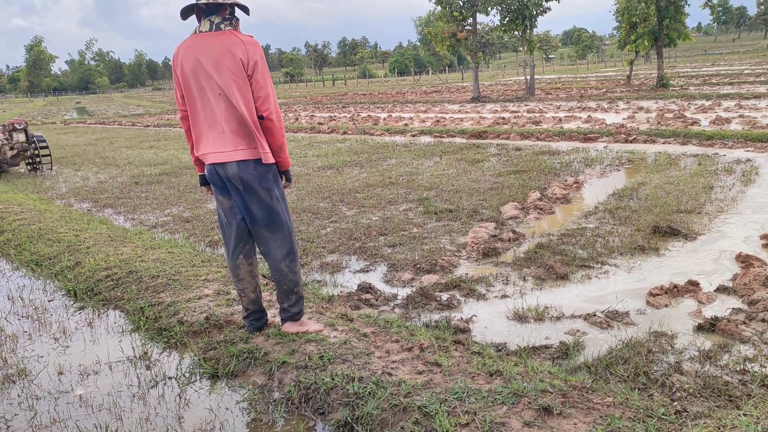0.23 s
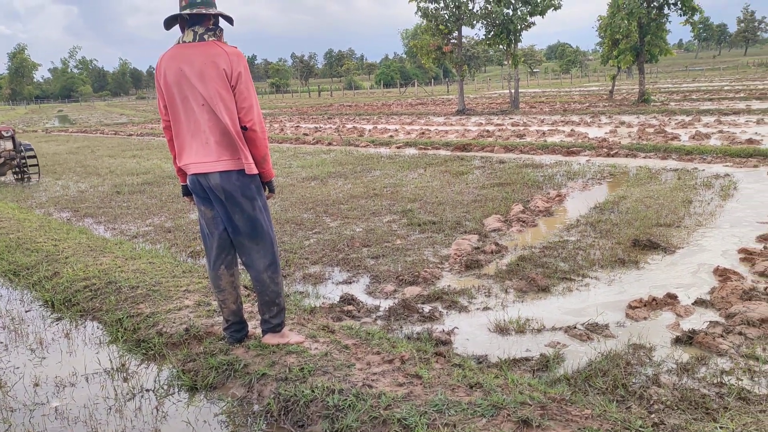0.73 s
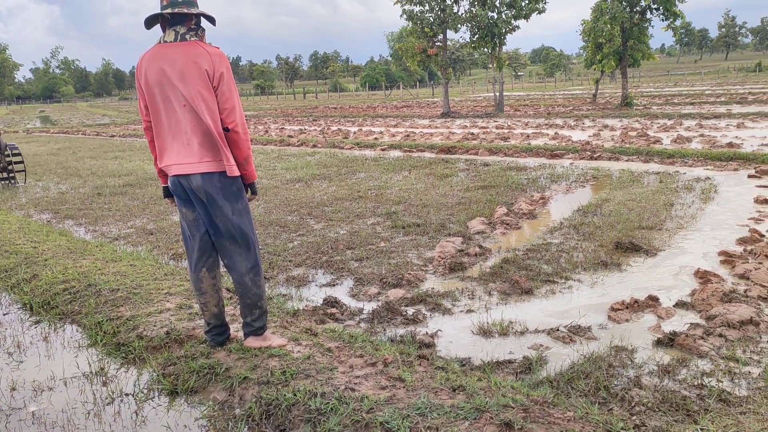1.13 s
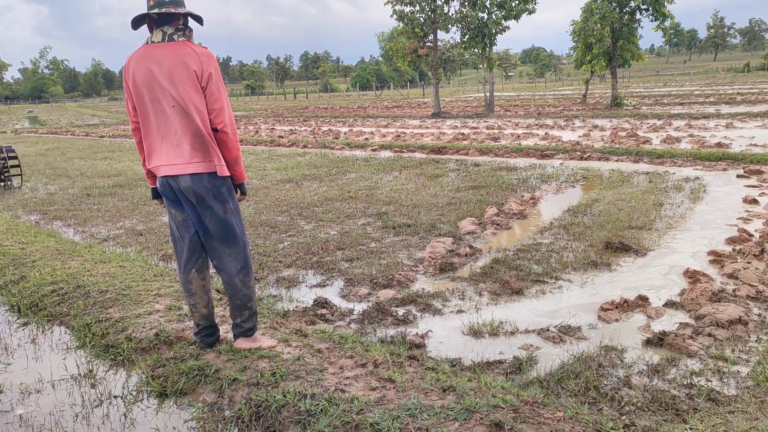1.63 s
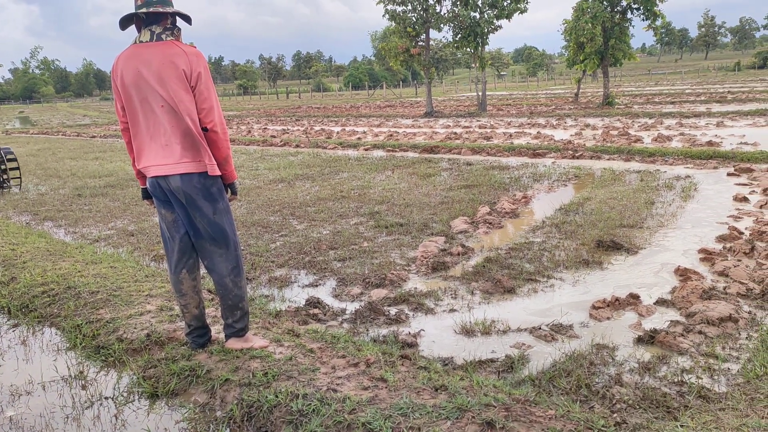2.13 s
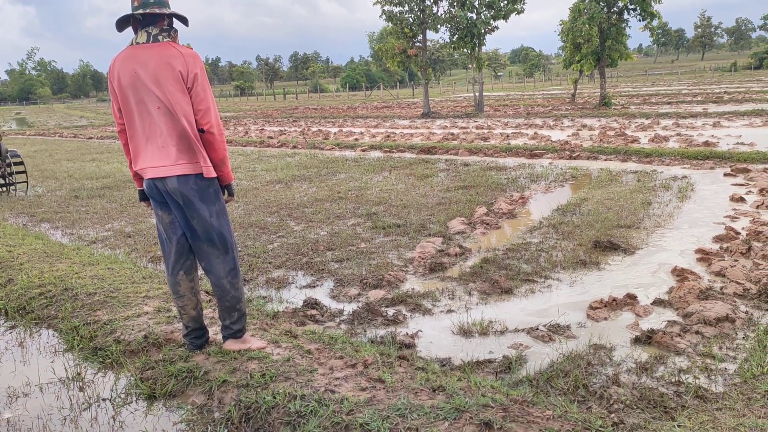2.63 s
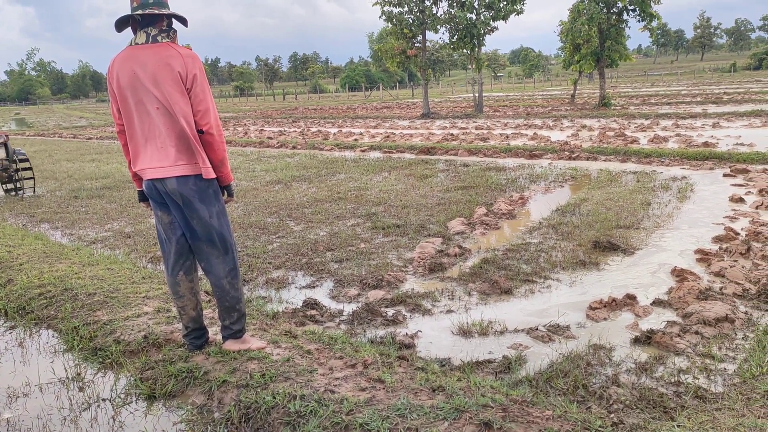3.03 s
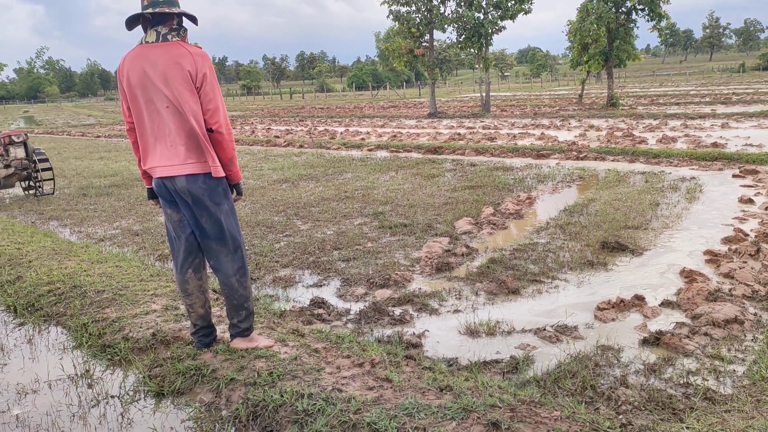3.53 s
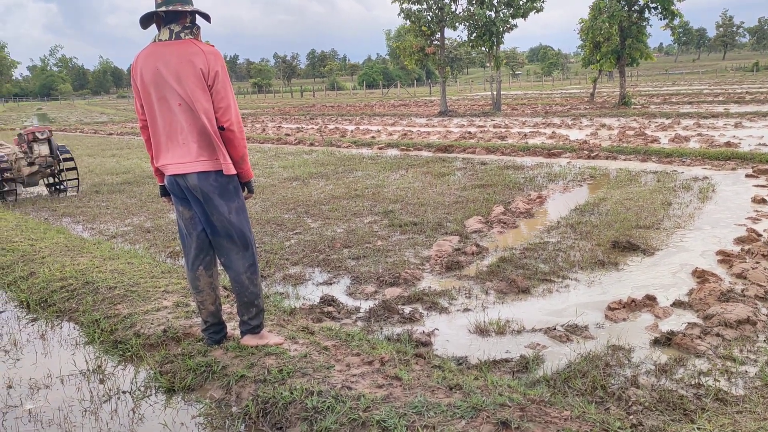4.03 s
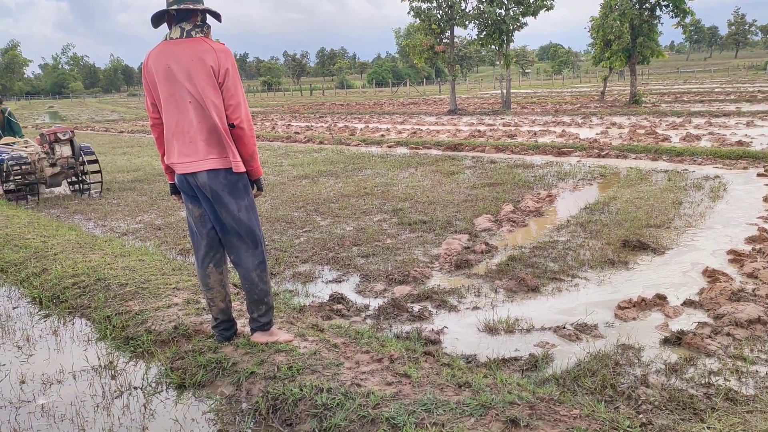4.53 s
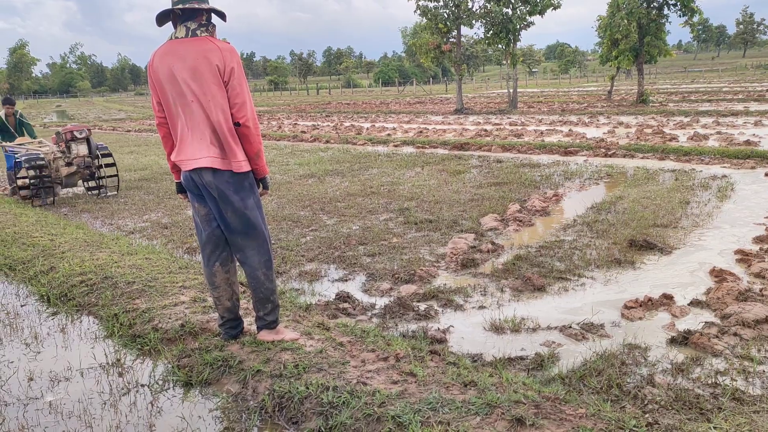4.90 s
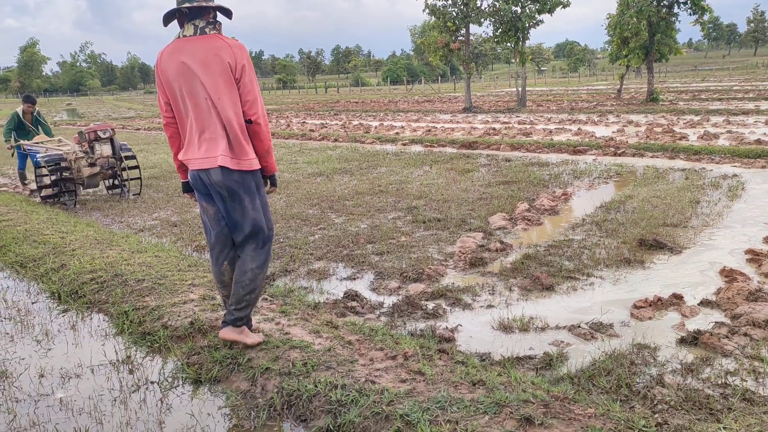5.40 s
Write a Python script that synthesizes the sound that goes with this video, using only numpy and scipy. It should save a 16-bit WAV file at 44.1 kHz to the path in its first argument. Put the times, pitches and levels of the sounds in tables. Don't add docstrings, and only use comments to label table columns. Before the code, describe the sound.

A single-cylinder diesel walking tractor knocks rapidly off to the left in an open field while wind gusts thud and crackle over the microphone.

```python
import sys
import numpy as np
from scipy import signal
from scipy.fft import rfft, irfft, next_fast_len
from scipy.io import wavfile
from scipy.ndimage import uniform_filter1d

SR = 44100
rng = np.random.default_rng(int(sys.argv[2]) if len(sys.argv) > 2 else 0)


def makeup_ratio(level_db):
    decades = np.asarray(level_db, float) / 20
    return 10 ** decades


def to_wav(sig):
    pcm = np.clip(np.atleast_2d(sig), -1, 1) * 32767
    pcm = np.round(pcm).astype(np.int16)
    wavfile.write(sys.argv[1], SR, pcm.T)


N = 249606
T = np.arange(N) / SR
COARSE = T[::64]
LAG_S = 14 / SR


# [t/s, level/dB, turn toward the bright side/dB]
RUNNING = [(0, 0, 1.5), (0.3, 1, 1), (0.52, 0, 2), (0.9, 3, -3.5), (1.4, 2.5, -1), (1.63, -2.5, -2),
           (1.95, 2.5, -3), (2.17, -2, 0.5), (2.27, -5, -3), (2.6, -1, -1.5), (3.0, 2.5, -1),
           (3.22, -3.5, -0.5), (3.7, 2.5, 0.5), (3.95, -2, 3), (4.2, 2, 2.5), (4.54, 1.5, 0),
           (4.62, -8.5, 1.5), (5.66, -9, 2)]


def running():
    return curves(RUNNING)


# [t/s, firings so far]
CRANK = [(-0.007, 0), (0.703, 7), (1.528, 15), (2.048, 20), (2.761, 27), (3.267, 32), (4.067, 40),
         (4.86, 48), (5.447, 54), (5.75, 57)]


def crank():
    s, turned = np.transpose(CRANK)
    firings = np.interp(np.arange(turned[-1] + 1), turned, s)
    cycle = np.searchsorted(firings, T, "right") - 1
    return cycle, T - firings[cycle], np.diff(firings)


def knock():
    cycle, since, length = crank()
    level_db, turn_db = running()
    luck_db = 1.73 * rng.standard_normal((len(length), 2))[cycle]
    low_db = -24 + level_db - 0.19 * turn_db + luck_db[:, 0]
    high_db = -25.5 + 0.88 * level_db + 1.44 * turn_db + luck_db[:, 1]
    fresh = port_noise()
    habit = fresh[:, :SR][:, np.round(since * SR).astype(int)]
    white = 0.5 * habit + 0.87 * fresh
    deep = burst(since - 0.0012, 0.00091, 0.0051) + makeup_ratio(-11.5) * burst(since, 0.001, 0.047)
    low = burst(since, 0.0007, 0.0045) + makeup_ratio(-16) * burst(since, 0.0021, 0.038)
    high = burst(since, 0.00098, 0.0065) + makeup_ratio(-10) * burst(since, 0.0044, 0.027)
    blows = ping(low_db - 2.2 * turn_db, since)
    blows += block(makeup_ratio(low_db - 1) * white * deep, 490, 1600, 0.64, port=0)
    blows += block(makeup_ratio(low_db + 4.5) * white * low, 1540, 3532, 0.34, port=0)
    blows += block(makeup_ratio(high_db - 1) * white * high, 3390, 8670, 1, port=1)
    blows += block(makeup_ratio(low_db - 26.5) * white * high, 4800, 15600, 0.1, port=0)
    return blows


def ping(cycle_db, since):
    tone = np.sin(2 * np.pi * 2697 * since)
    note = makeup_ratio(cycle_db + 2.5) * burst(since, 0.00097, 0.0033) * tone
    return np.array([note, makeup_ratio(-9) * np.interp(T - LAG_S, T, note)])


# [f/Hz, width/Hz, level over the valleys/dB]
BLOCK = [(1150, 80, 4), (1425, 22, 17), (1780, 90, 7), (2010, 70, 8), (2350, 110, 9), (2680, 170, 13),
         (3300, 150, 4), (3750, 110, 8), (4550, 250, 5), (4800, 120, 5), (5850, 200, 6), (6780, 200, 7)]


def block(drive, lo_hz, hi_hz, ring, port):
    hz = np.fft.rfftfreq(8192, 1 / SR) + 1
    peaks = sum(makeup_ratio(2 * ring * db) / (1 + (2 * (hz - f) / w) ** 2) for f, w, db in BLOCK)
    edges = 1 / (1 + (lo_hz / hz) ** 24) / (1 + (hz / hi_hz) ** 24)
    body_db = 10 * np.log10((1 + peaks) * edges + 1e-12)
    heard_db = body_db + read((LEFT_PORT, RIGHT_PORT)[port], hz)
    gain = np.sqrt(np.mean(makeup_ratio(2 * heard_db)))
    response = causal(body_db + read(LEFT_PORT, hz))
    return signal.oaconvolve(drive, response[None] / gain, axes=1)[:, :N]


# [f/Hz, level/dB]
LEFT_PORT = [(600, -17.5), (950, -22), (1250, 7.5), (2600, 7.5), (3100, -0.5), (4200, 3.5), (5300, -4.5),
             (6500, -7.5), (7400, -12.5), (8100, -23), (9000, -13), (10400, -10), (13500, -6.5), (15300, 0)]
RIGHT_PORT = [(600, -50), (950, -4), (1250, -1.5), (2200, -0.5), (3100, 0.5), (4500, 7.5), (5500, 2),
              (6500, -10), (7300, -33), (8100, -63), (9400, -25), (11500, -12), (13000, -120),
              (15300, -117)]
# [f/Hz, likeness 0-1]
LIKENESS = [(1000, .95), (1500, 0.88), (3400, 0.9), (4300, 0.75), (6000, 0.4), (7500, 0.5), (15000, 0.4)]


def port_noise():
    size = next_fast_len(N)
    hz = np.fft.rfftfreq(size, 1 / SR)
    left, other = rfft(rng.standard_normal((2, size)))
    same = np.clip(read(LIKENESS, hz), 0, 1)
    late = left * np.exp(-2j * np.pi * hz * LAG_S)
    right = same * late + np.sqrt(1 - same ** 2) * other
    shade = makeup_ratio(read(RIGHT_PORT, hz) - read(LEFT_PORT, hz))
    return irfft([left, right * shade], size)[:, :N]


# [share of the cycle, level over the clatter/dB, decay/s]
VALVES = [
    (.27, 5, 0.0082),
    (.44, -11.5, 0.002),
    (.52, 8.5, 0.0056),
    (.78, -6.5, 0.0095),
]


def clatter():
    cycle, since, length = crank()
    level_db, turn_db = running()
    low_db = -46.5 + 0.99 * level_db
    high_db = -39.5 + 0.98 * level_db + 0.97 * turn_db
    luck = rng.standard_normal((len(length), 2 * len(VALVES)))
    flare = np.ones(N)
    for k, (share, db, decay) in enumerate(VALVES):
        start = share * length + 0.0034 * luck[:, 2 * k]
        spread_db = 2.2 * luck[cycle, 2 * k + 1]
        flare += makeup_ratio(db + spread_db) * burst(since - start[cycle], 0.0009, decay)
    white = port_noise() * evened(flare)
    soft = port_noise() * evened(flare + 0.56)
    bed = makeup_ratio(low_db + 7) * block(soft, 370, 3210, 0.6, port=0)
    bed += makeup_ratio(high_db + 2.1) * block(white, 3125, 8960, 0.96, port=1)
    bed += makeup_ratio(low_db - 13.5) * block(0.75 * white + soft, 6500, 14600, 0.1, port=0)
    return blotched(bed, patchy_db=3.5, bins=5, frames=5)


def blotched(x, patchy_db, bins, frames):
    z = signal.stft(x, nperseg=512)[2]
    patches = rng.standard_normal(z.shape[1:])
    patches = uniform_filter1d(patches, bins, 0)
    patches = evened(uniform_filter1d(patches, frames, 1))
    gain = evened(makeup_ratio(patchy_db * patches))
    return signal.istft(z * gain, nperseg=512)[1][:, :N]


# [share of the cycle, f/Hz, level/dB, swell/s, push +1 or pull -1]
THUMPS = [
    (.245, 185, -2.5, .0018, 1),
    (.535, 240, 0, .0021, -1),
    (.815, 160, -8, .005, 1),
]
# [f/Hz, level/dB]
ROAR = [(60, -28), (150, 1.5), (260, 1), (370, -22.5), (480, -9), (620, -12), (800, -23), (1000, -25.5),
        (1500, -58)]


def exhaust():
    cycle, since, length = crank()
    luck = rng.standard_normal((len(length), 2 * len(THUMPS)))
    slugs, puffs = np.zeros(N), np.full(N, 0.6)
    for k, (share, hz, db, swell, sign) in enumerate(THUMPS):
        start = share * length + 0.000083 * luck[:, 2 * k]
        t = np.maximum(since - start[cycle], 0)
        thump_db = db + 1.2 * luck[cycle, 2 * k + 1]
        shape = makeup_ratio(thump_db) * t / swell * np.exp(1 - t / swell)
        slugs += sign * shape * np.sin(2 * np.pi * hz * t)
        puffs += shape
    level = makeup_ratio(-25 + 0.72 * running()[0])
    roar = evened(puffs) * noise(ROAR)
    pipe = level * (makeup_ratio(6) * slugs + makeup_ratio(-8) * roar)
    return np.array([makeup_ratio(1) * pipe, np.interp(T - LAG_S, T, pipe)])


# [t/s, peak level/dB, width/s]
SLAPS = [(1.195, -3, 0.0014), (1.5, -11, 0.00052), (1.577, -9, 0.0011), (2.148, -3, 0.00086),
         (2.207, -3, 0.00072), (2.215, 4, 0.00045), (2.243, 0, 0.00057), (3.107, -11, 0.00076),
         (3.122, -3, 0.00058), (3.197, -10, 0.0014), (3.899, -1, 0.00052), (3.934, -3, 0.00064),
         (3.946, -3, 0.00076), (4.509, -3, 0.00054), (4.582, -3, 0.00023), (4.606, -3, 0.00018),
         (4.637, 0, 0.00044), (4.713, -5.5, 0.00055), (4.82, -11, 0.0007), (4.897, 2, 0.00057),
         (5.023, -15, 0.00029), (5.166, -4.5, 0.00039), (5.195, -8.5, 0.00044), (5.243, -1, 0.00051),
         (5.252, -3, 0.00034), (5.265, -3, .00034), (5.3, -7, 0.00046), (5.384, -6, 0.00054),
         (5.454, -14, .0003), (5.469, -3, 0.00036)]
# [t/s, rumble level/dB]
LEE = [(0, -29), (.4, -34), (1.0, -38), (1.2, -34), (1.6, -34), (2.0, -26), (2.4, -38), (2.7, -34),
       (3.0, -40), (3.2, -28), (3.5, -32), (4.25, -30), (4.6, -40), (4.9, -32), (5.5, -41), (5.66, -22)]
# [f/Hz, level/dB]
RUMBLE = [(8, -9.5), (20, 2), (50, 3), (100, -0.5), (140, -11), (250, -15), (500, -97)]


def wind():
    flutter_db, rumble_db, near, stir = gusts()
    crackle_db = -31 + 1.31 * (flutter_db + 12) + 7.5 * near
    spit_db = -47.5 + 0.53 * (flutter_db + 12.5) + 7.8 * near
    lumps = uniform_filter1d(rng.standard_normal(N), 400)
    lumps = evened(uniform_filter1d(lumps, 400))
    slaps = np.zeros(N)
    for s, db, width in SLAPS:
        u = np.sqrt((np.arange(-150, 150) / SR / width) ** 2 + 0.2)
        slap = (1 - u) * np.exp(-u) * np.hanning(300)
        slaps[round(s * SR) - 150:][:300] += makeup_ratio(min(db, -3) + 8) * slap
    flutter = makeup_ratio(1.96 * lumps) * eddies(128, 320, 320, 3.6, turns=2.1)
    crackle = makeup_ratio(2.5 * lumps) * eddies(340, 680, 700, 3, turns=2.4)
    left = makeup_ratio(rumble_db) * steadied(noise(RUMBLE), 0.02)
    left += makeup_ratio(flutter_db - 1.18) * steadied(evened(flutter * np.sqrt(stir)), 0.18)
    left += makeup_ratio(crackle_db) * steadied(evened(crackle * stir ** 0.64), 0.04)
    left += makeup_ratio(spit_db) * eddies(600, 1300, 250, 4.4, turns=2.1)
    right = makeup_ratio(curves(LEE)[0] - 3.8) * steadied(noise(RUMBLE), 0.14)
    return np.array([left + slaps, right])


# [start t/s, length/s, flutter level/dB, rumble level relative to it/dB]
GUSTS = [(-.1, 0.15, -19.5, 1.5), (0.214, 0.14, -11, -5.5), (0.28, 0.12, -17, 5),
         (0.352, 0.081, -14.5, -17), (0.567, 0.3, -32.5, 2), (0.78, .17, -22.5, 0), (1.04, 0.19, -10, -8.5),
         (1.218, 0.11, -20, -11), (1.32, 0.11, -16, -9), (1.456, 0.19, -9.5, -1.5),
         (1.638, 0.28, -19.5, -4), (1.86, 0.34, -21, 3.5), (2.003, .2, -12, -2), (2.17, 0.13, -11, -0.5),
         (2.254, 0.26, -15, -7.5), (2.5, 0.28, -19, -5), (2.695, 0.13, -15.5, -1.5),
         (2.97, 0.09, -13.5, -4), (3.04, 0.2, -10, -1.5), (3.292, 0.27, -24.5, 1), (3.543, 0.25, -20, -2.5),
         (3.782, 0.083, -16, -0.5), (3.852, 0.16, -11.5, -3.5), (4.153, 0.16, -16.5, -1),
         (4.284, 0.21, -14.5, 0), (4.479, .2, -8, -2), (4.593, 0.42, -14.5, 3.5), (4.846, 0.41, -13.5, 2.5),
         (5.206, .2, -14.5, -3), (5.31, 0.44, -14.5, -0.5)]


def gusts():
    start, length, db, rumble_db = np.transpose(GUSTS)[:, :, None]
    arch = abs(np.sin(np.pi * np.clip((COARSE - start) / length, 0, 1)))
    swell = makeup_ratio(2 * db) * arch ** 1.88
    flutter = makeup_ratio(2 * -35) + swell.sum(axis=0)
    rumble = makeup_ratio(2 * -29) + (makeup_ratio(2 * rumble_db) * swell).sum(axis=0)
    apart = COARSE - np.transpose(SLAPS)[0][:, None]
    near = np.tanh(np.exp(-(apart / 0.05) ** 2).sum(axis=0))
    stir = 0.5 + 2.4 * np.exp(-(apart / 0.004) ** 2).sum(axis=0)
    slow = (10 * np.log10(flutter), 10 * np.log10(rumble), near, stir)
    return [np.interp(T, COARSE, c) for c in slow]


def eddies(lo_hz, hi_hz, per_s, spread_db, turns):
    size = makeup_ratio(spread_db * np.minimum(rng.exponential(1, N), 3)) * rng.choice([-1, 1], N)
    size *= rng.random(N) < per_s / SR
    kind = rng.integers(0, 8, N)
    total = np.zeros(N)
    for k, hz in enumerate(np.geomspace(lo_hz, hi_hz, num=8)):
        total += signal.oaconvolve(size * (kind == k), eddy(hz, turns), "same")
    return evened(total)


def eddy(hz, turns):
    t = np.arange(round(turns * SR / hz)) / SR
    return np.hanning(len(t)) * np.cos(2 * np.pi * hz * (t - t.mean())) / np.sqrt(len(t))


def steadied(x, span_s):
    size = round(span_s * SR)
    power = uniform_filter1d(uniform_filter1d(x ** 2, size), size)
    return x / np.sqrt(power + 0.055)


def burst(since, rise, decay):
    since = np.maximum(since, 0)
    return (1 - np.exp(-since / rise)) * np.exp(-since / decay)


def noise(points):
    size = next_fast_len(N)
    colour = makeup_ratio(read(points, np.fft.rfftfreq(size, 1 / SR)))
    return evened(irfft(rfft(rng.standard_normal(size)) * colour, size)[:N])


def evened(x):
    return x / np.sqrt(np.mean(x ** 2) + 1e-20)


def read(points, hz):
    f, value = np.transpose(points)
    return np.interp(np.log(hz + 1), np.log(f + 1), value)


def curves(rows):
    s, *columns = np.transpose(rows)
    return [np.interp(T, s, c) for c in columns]


def causal(db):
    log = np.maximum(db, -100) * np.log(10) / 20
    log = np.concatenate([log, log[-2:0:-1]])
    return np.fft.ifft(np.exp(np.conj(signal.hilbert(log)))).real[:len(db)]


def scene():
    return knock() + clatter() + exhaust() + wind()


# [f/Hz, level/dB]
DISCARD = [(1500, -18), (2500, -15.5), (4000, -10.5), (5500, -7.5), (7000, -2), (9000, 0.2), (13000, 0.5),
           (15500, 6)]


def thinned(x):
    hz, _, z = signal.stft(x, SR, nperseg=1024)
    power = abs(z) ** 2
    near = uniform_filter1d(uniform_filter1d(power, size=3, axis=1), size=2, axis=2)
    around = uniform_filter1d(uniform_filter1d(power, size=24, axis=1), size=4, axis=2)
    kept = near > around * makeup_ratio(2 * read(DISCARD, hz))[:, None]
    kept *= hz[:, None] < 15650
    return signal.istft(z * np.maximum(kept, 0.002), SR, nperseg=1024)[1][:, :N]


def low_pass(x):
    return signal.sosfilt(signal.butter(12, 15710, fs=SR, output="sos"), x)


def record(dry):
    ceiling = 0.93
    limited = dry / (1 + abs(dry / ceiling) ** 6) ** (1 / 6)
    return low_pass(thinned(limited))


dry = scene()
out = record(dry)
to_wav(out)
```